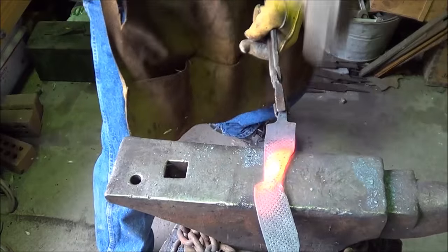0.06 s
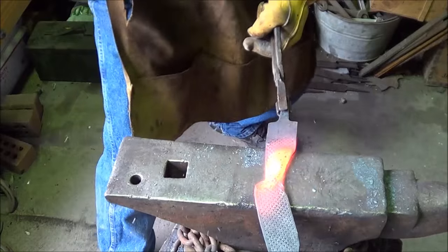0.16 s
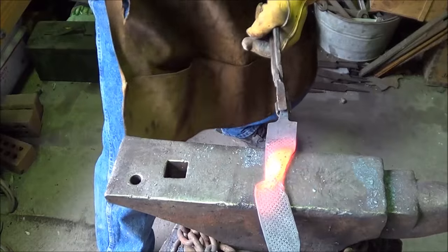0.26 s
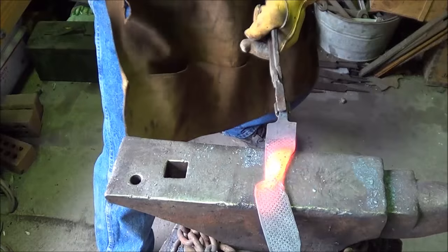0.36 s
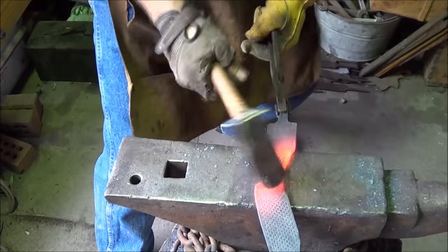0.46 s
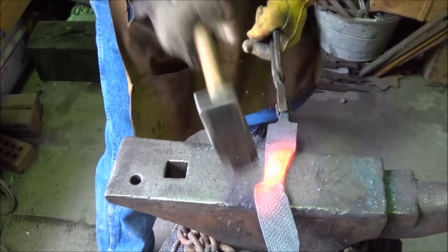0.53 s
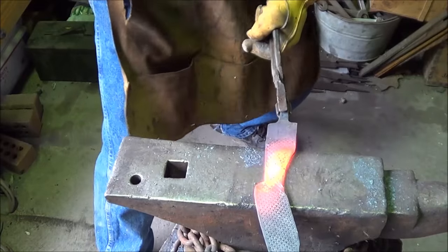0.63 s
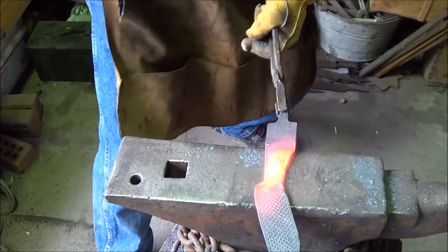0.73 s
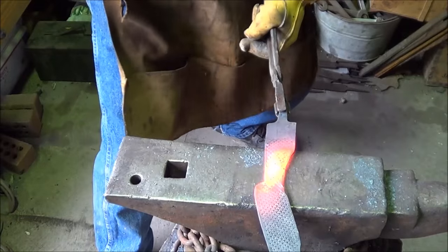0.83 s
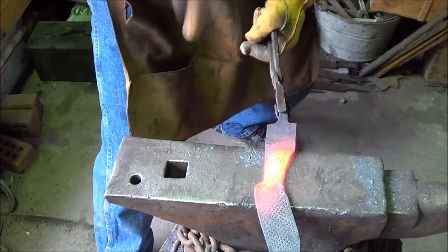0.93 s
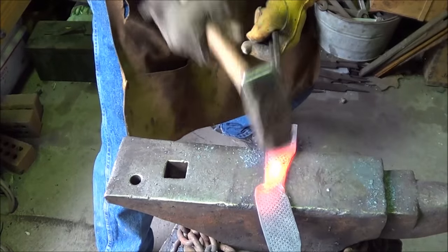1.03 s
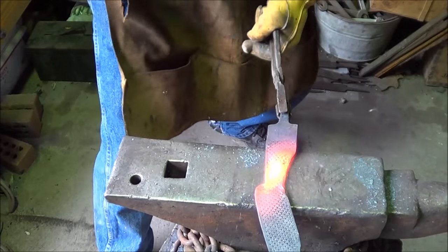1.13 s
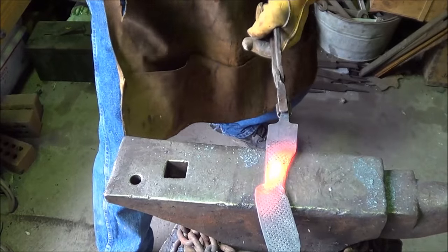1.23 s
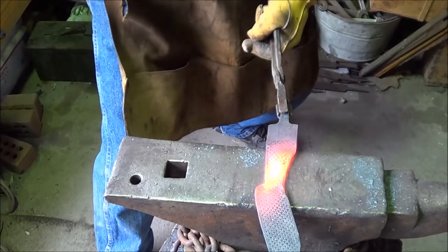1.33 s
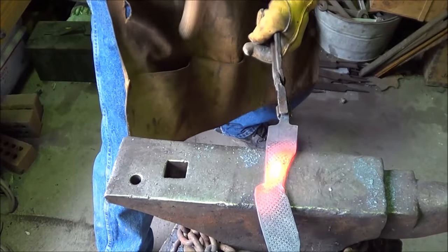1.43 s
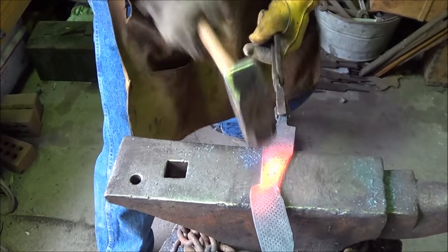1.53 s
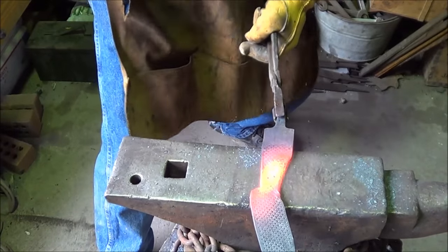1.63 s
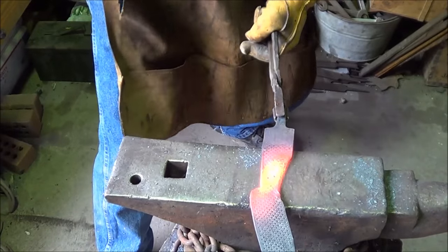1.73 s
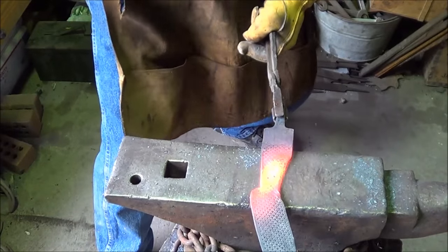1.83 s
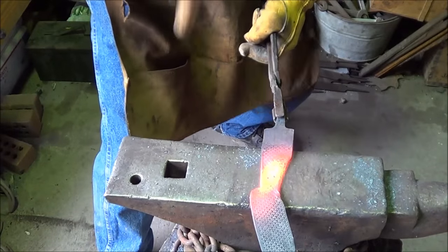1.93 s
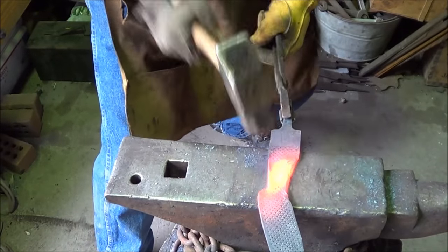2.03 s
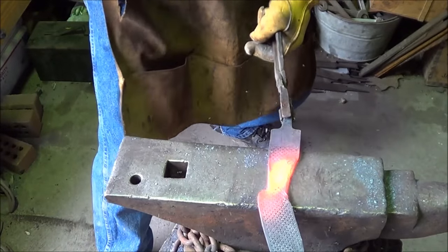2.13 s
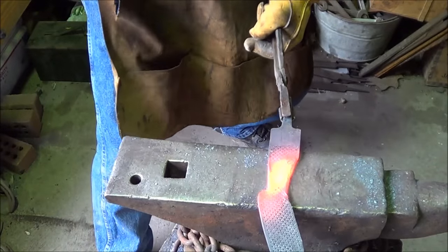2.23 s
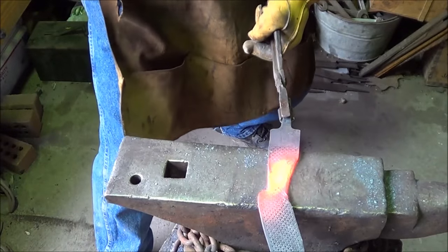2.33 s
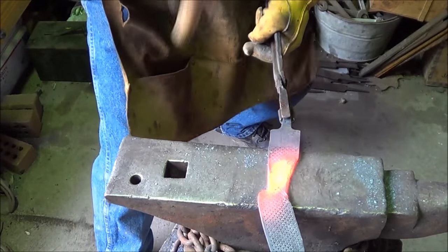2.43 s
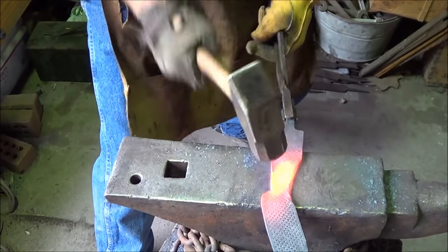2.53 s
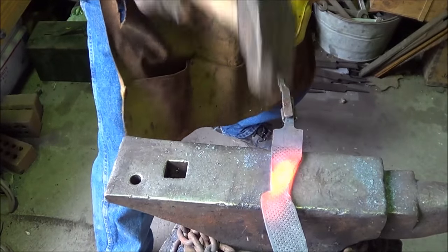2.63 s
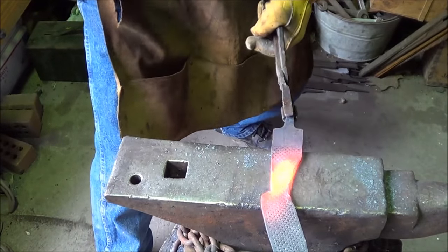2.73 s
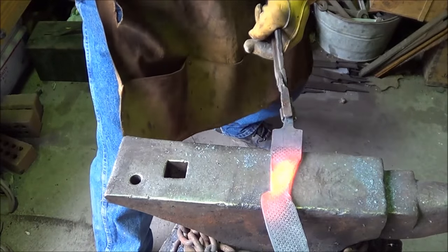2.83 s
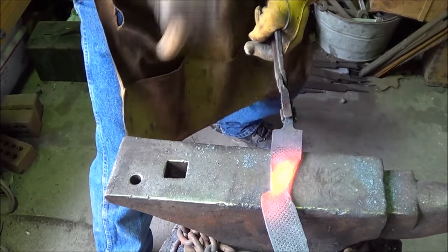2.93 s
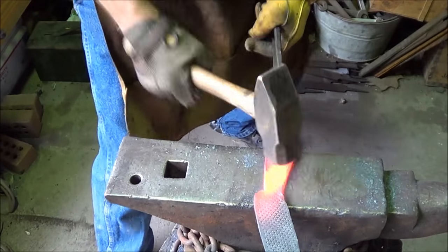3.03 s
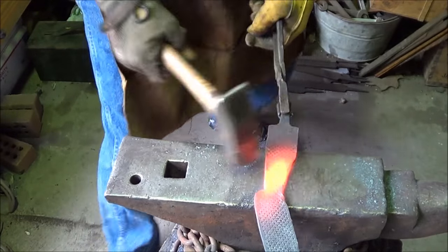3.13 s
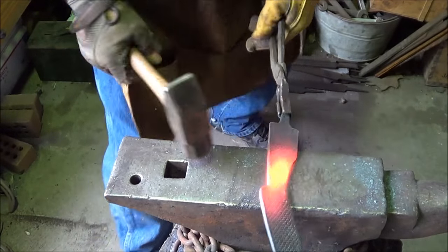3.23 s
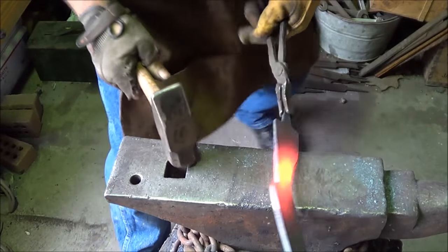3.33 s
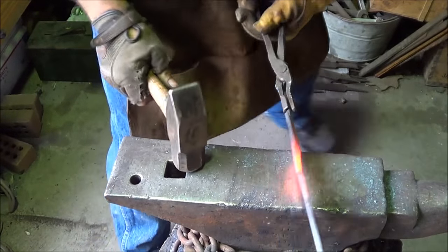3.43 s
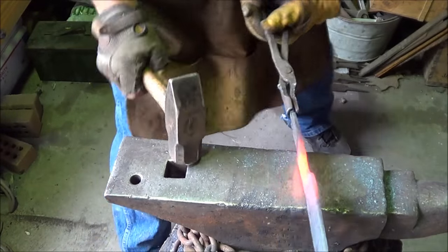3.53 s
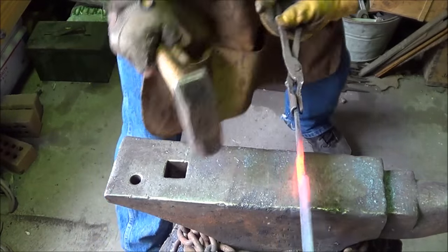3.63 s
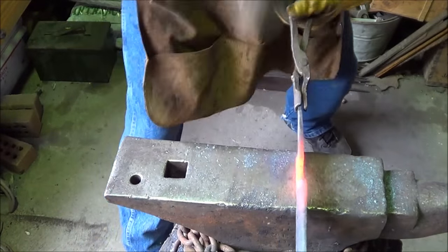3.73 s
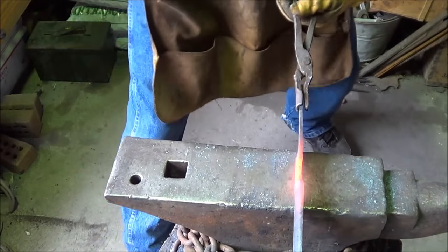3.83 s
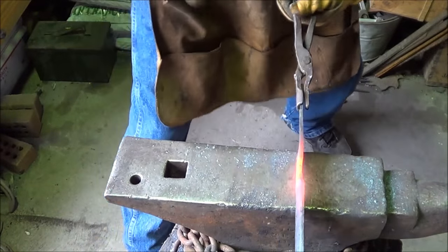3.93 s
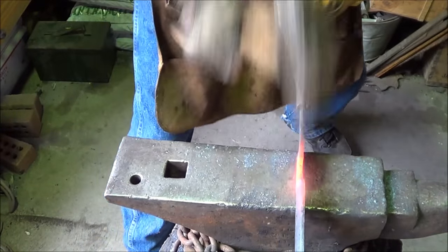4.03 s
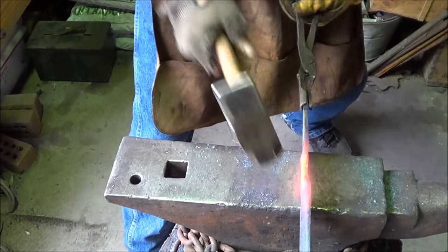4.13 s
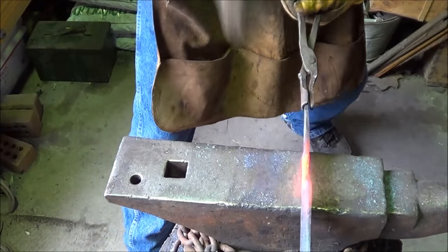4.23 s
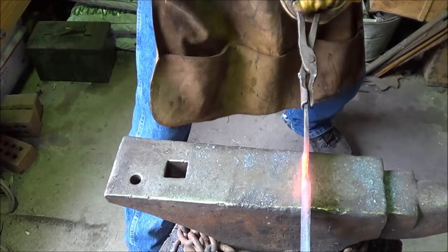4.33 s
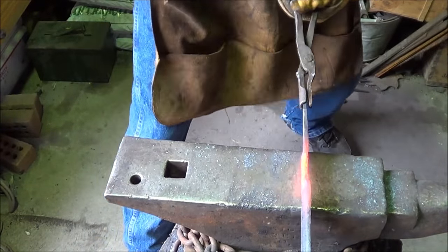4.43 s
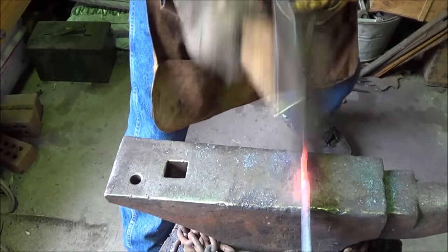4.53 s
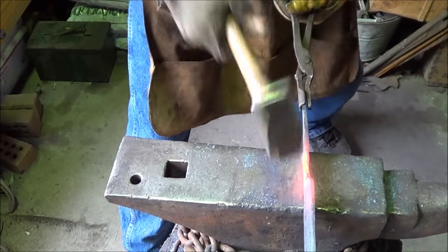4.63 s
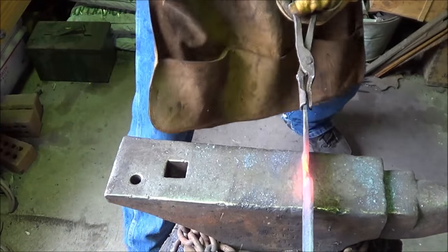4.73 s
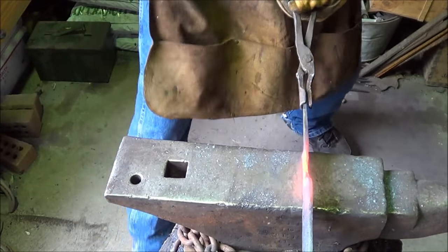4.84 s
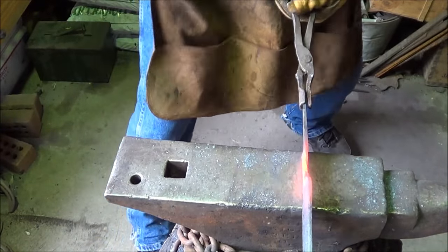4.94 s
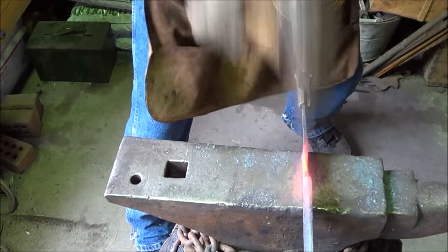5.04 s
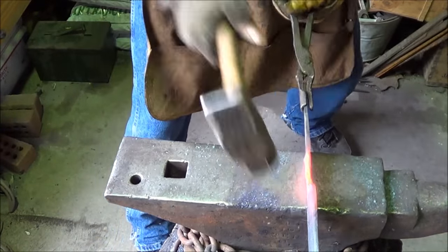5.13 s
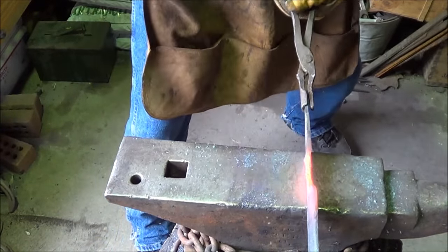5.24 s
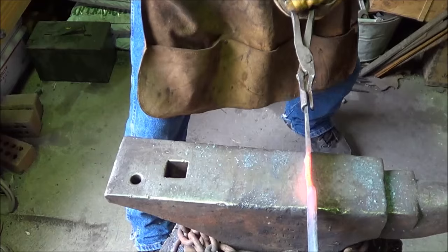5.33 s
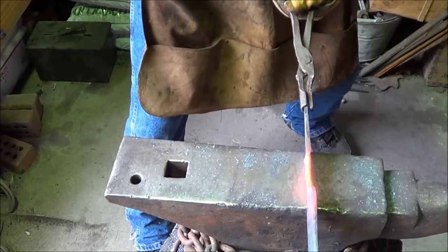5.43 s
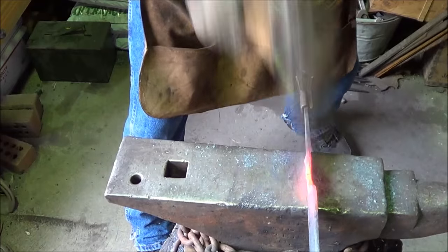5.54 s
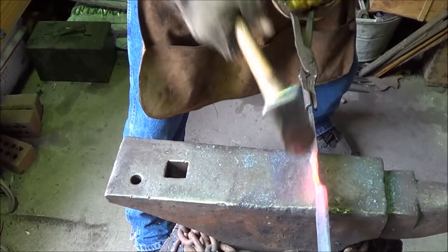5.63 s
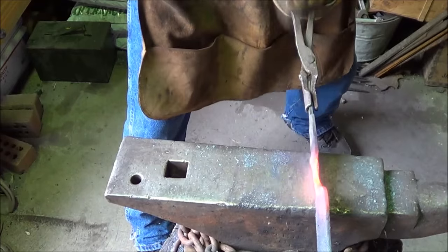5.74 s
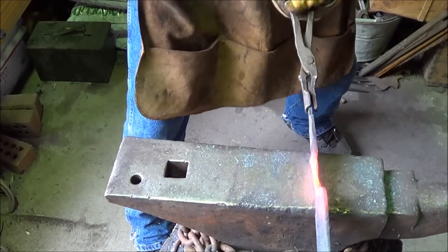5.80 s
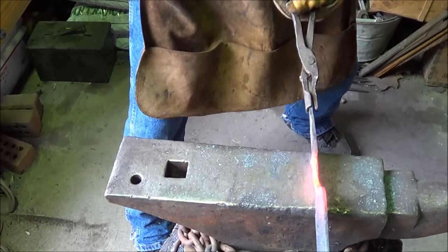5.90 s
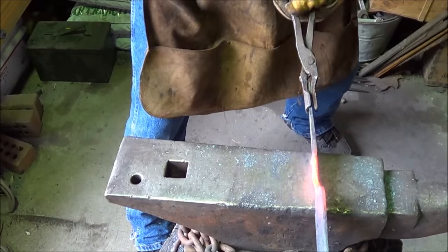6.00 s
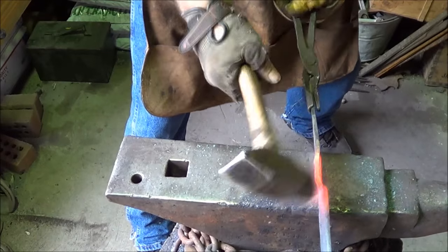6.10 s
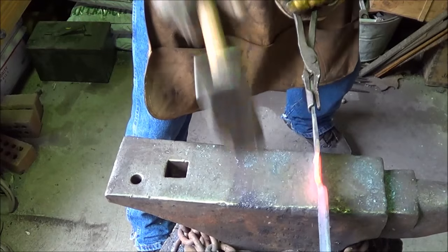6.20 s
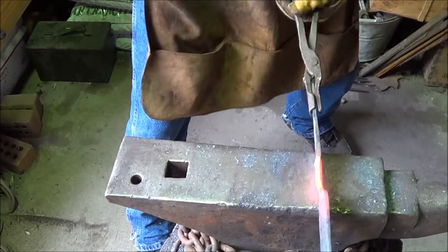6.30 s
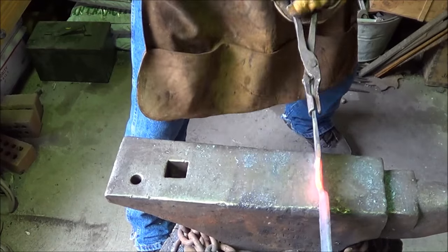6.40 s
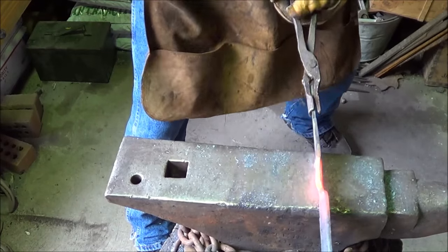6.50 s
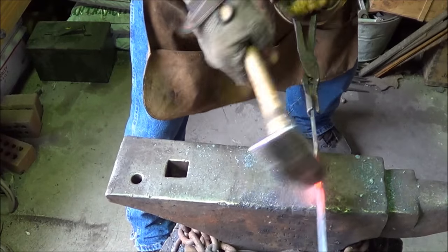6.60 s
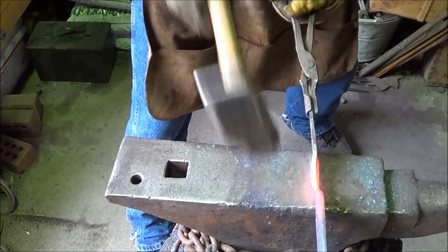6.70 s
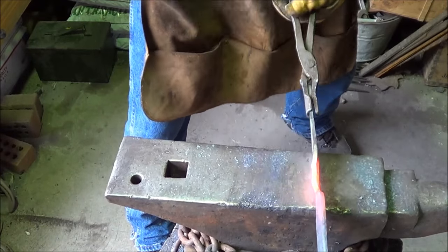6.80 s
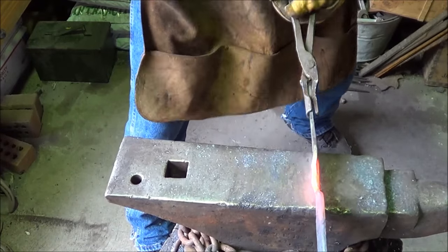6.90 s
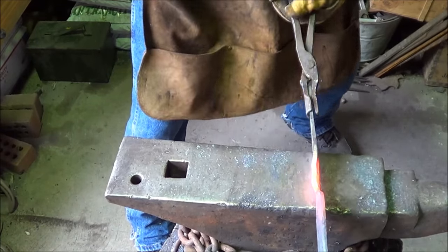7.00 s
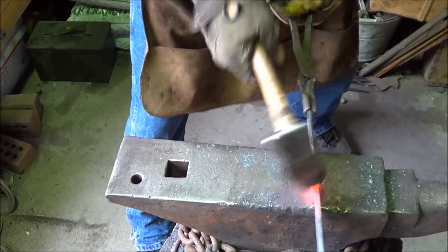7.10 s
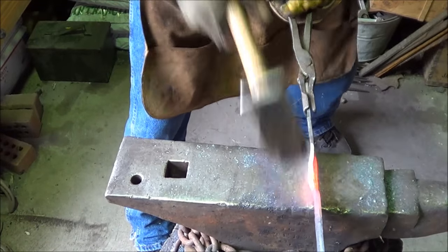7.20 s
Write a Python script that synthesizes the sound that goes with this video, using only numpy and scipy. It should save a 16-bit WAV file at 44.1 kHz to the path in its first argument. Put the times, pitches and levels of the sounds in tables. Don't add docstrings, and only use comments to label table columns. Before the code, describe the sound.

Steady loud hammer clangs on an anvil in a hard, echoing workshop, briefly broken by small taps and tong clicks, with a low fan hum beneath.

```python
import sys
import numpy as np
from scipy import signal
from scipy.fft import rfft, irfft
from scipy.io import wavfile
from scipy.ndimage import uniform_filter1d

SR = 44100
rng = np.random.default_rng(int(sys.argv[2]) if len(sys.argv) > 2 else 0)


def convert_level_to_amplitude(level_db):
    exponent = np.asarray(level_db, float) / 20
    return 10 ** exponent


def store_pcm(level_fs):
    pcm = np.round(np.clip(level_fs, -1, 1) * 32767).astype(np.int16)
    wavfile.write(sys.argv[1], SR, np.atleast_2d(pcm).T)


N = 320166


def rms_one(x):
    return x / np.sqrt(np.mean(x ** 2) + 1e-20)


def at_hz(points, hz):
    point_hz, value = np.array(points)[:, 0], np.array(points)[:, 1]
    return np.interp(np.log(hz), np.log(point_hz), value)


def strikes(seconds, db):
    clicks = np.full(N, 1e-18)
    places = np.round(np.asarray(seconds) * SR).astype(int)
    clicks[np.clip(places, 0, N - 1)] = convert_level_to_amplitude(np.asarray(db))
    return clicks


def fade(clicks, t60):
    return signal.lfilter([1], [1, -convert_level_to_amplitude(-60 / (t60 * SR))], clicks)


def build_up(clicks, t60, rise_s):
    r = np.exp(-1 / (rise_s * SR))
    return signal.lfilter([1 - r], [1, -r], fade(clicks, t60))


def band(x, low_hz, high_hz):
    sos = signal.butter(2, [low_hz, min(high_hz, 0.45 * SR)], "band", fs=SR, output="sos")
    return signal.sosfilt(sos, x)


def colour(x, spectrum):
    length = x.shape[-1]
    hz = np.fft.rfftfreq(length, 1 / SR) + 1
    return rms_one(irfft(rfft(x) * convert_level_to_amplitude(at_hz(spectrum, hz)), length))


# pitch_hz, side_minus_mid_db
WIDTH = [(60, -18), (180, -19.5), (550, -15), (1650, -13.5), (4970, -9.5), (15000, -19)]
# pitch_hz, left_minus_right_db
LEAN = [(60, -1), (240, -2), (950, -2.5), (3770, -0.5), (15000, -1)]


def spread(mid, side):
    hz = np.fft.rfftfreq(len(mid), 1 / SR) + 1
    lean = convert_level_to_amplitude(at_hz(LEAN, hz) / 2)
    m = rfft(mid)
    s = rfft(side) * convert_level_to_amplitude(at_hz(WIDTH, hz))
    left, right = (m + s) * lean, (m - s) / lean
    return np.array([irfft(left, len(mid)), irfft(right, len(mid))])


# start_s, force_db (over the limiter), thud_db, body_db, scale_spray_db
BLOWS = [(0.0, 6.5, 1, 4.5, 3), (0.5151, 13, -1.5, 3.5, 3), (1.0331, 12.5, -3.5, 6, 2.5),
         (1.537, 9.5, -2, 5, 1.5), (2.0396, 10, -6.5, 4.5, 1.5), (2.545, 13, -13, 2.5, -1),
         (3.048, 10.5, -9.5, 1.5, -3), (3.233, -3, -11.5, 1, -15), (3.368, -4, -5.5, 4, -23),
         (3.4309, -31, 13, 17, -26), (3.462, -39, -47, 18, -35), (4.118, 3.5, 2, 1, -7),
         (4.608, 3.5, 2, 4, -1), (5.1175, 8, -0.5, 3.5, -0.5), (5.62, 9, -1, 4, -2),
         (6.1322, 8.5, -2, 5.5, -5), (6.647, 11.5, -5, 4.5, -4.5), (7.157, 10, -4.5, 3, -7.5)]


def impact():
    start_s, force, thud, body, spray = np.transpose(BLOWS)
    noise = rng.standard_normal(N)
    flat_db = np.where(start_s < 3.0, 0, -9.0)
    push = band(strikes(start_s, force + flat_db + 17), 31, 320)
    sharp = 0.48 * force
    crack = band(noise, 2500, 18000) * fade(strikes(start_s + 0.00013, sharp + spray - 1.5), 0.02)
    clank_env = fade(strikes(start_s + 0.0006, sharp + body + 2.05), 0.018)
    bare = np.abs(np.arange(N) / SR - 3.6) < 0.4
    clank = np.where(bare, band(noise, 1370, 2380), band(noise, 780, 2000)) * clank_env
    return crack + clank - push


# pitch_hz, level_db (per Hz)
CRACK = [(24, -35), (40, -25), (237, 2.65), (570, -2.04), (770, -13.5), (2100, -11.5), (2840, -23),
         (3830, -10.5), (5050, -17.5), (7730, -2.5), (12800, -11), (16000, -66)]
# pitch_hz, t60_s
SHOP = [(60, 0.78), (160, 0.45), (420, 0.5), (1100, 0.43), (2900, 0.49), (7700, 0.37), (11000, 0.28),
        (15000, 0.085)]
EDGES = 30 * 2 ** np.arange(0, 9.3, 0.5)


def clangour():
    start_s, force, thud, body, spray = np.transpose(BLOWS)
    white, out = rng.standard_normal((2, 2, N)), np.zeros((2, N))
    stump_db = np.where(start_s < 4, -2, 3)
    for k, (low, high) in enumerate(zip(EDGES, EDGES[1:])):
        hz = np.sqrt(low * high)
        dull = at_hz([(500, 1), (800, 0)], hz)
        bright = at_hz([(4000, 0), (6000, 1)], hz)
        db = force + dull * thud + bright * spray + (1 - dull - bright) * body + at_hz(CRACK, hz)
        db += at_hz([(90, 1), (260, 0.23)], hz) * stump_db
        envelope = build_up(strikes(start_s, db - 2.0), at_hz(SHOP, hz), 0.0077 + 0.36 / low)
        out += band(white[k % 2], low, high) * envelope
    return spread(out[0], 1.79 * out[1])


# bend_db, twist_db, horn_db, face_db, edge_db
LANDING = [(-11, -21.5, -24, -13, -18), (-14.5, -20, -22, -28, -12), (-2.5, -19, -12, -15.5, -8),
           (-7, -17.5, -34, -12, -17), (-2, -10.5, -5, -9, -8), (-2.5, -15, -17.5, -7.5, -6.5),
           (-3, -20, -31, -11.5, -14), (-15, -33, -6.5, -13, -33), (-2, -17.5, -3.5, -19.5, -32),
           (-17, -32, -9, -26, -28), (-14, -38, -35, -35, -35), (-14.5, -31, -17.5, -16.5, -27),
           (-21, -20, -19, -9.5, -14), (-3, -12.5, -10.5, -6, -22), (-6, -11, -3.5, -15, -19),
           (-3.5, -9, -4, -18, -27), (-1.5, -13, -1, -10.5, -25), (-5, -14.5, -16, -13.5, -22)]
ANVIL_HZ = [
    [2110, 2102, 2684],
    [3755, 3743, 1836],
    [4720, 4540, 5655],
    [6438, 6320, 7300, 8493],
    [12623, 12940],
]
# level_db, t60_s
ANVIL = [
    [(10.5, 0.15), (-14, 0.5), (-20.5, 0.42)],
    [(4.5, 0.34), (-4, 0.42), (0, 0.3)],
    [(2, 0.33), (-17.5, 0.19), (-15, 0.089)],
    [(-0.5, 0.26), (11.5, 0.046), (4, 0.079), (11, 0.078)],
    [(9.5, 0.22), (-1, 0.1)],
]
BLOOM_S = [0.014, 0.013, 0.012, 0.012, 0.0077]


def anvil():
    start_s, force = np.transpose(BLOWS)[:2]
    t = np.arange(N) / SR
    bare = np.where(force < 3, 0.35, 1)
    chance_db = iter(rng.standard_normal((len(start_s), 15)).T)
    out = np.zeros(N)
    for share, pitches, modes, rise_s in zip(np.transpose(LANDING), ANVIL_HZ, ANVIL, BLOOM_S):
        for hz, (level_db, t60) in zip(pitches, modes):
            mode_db = max(level_db, 0) + bare * min(level_db, 0)
            db = force + share + mode_db - 11.0 + next(chance_db)
            out += build_up(strikes(start_s, db), t60, rise_s) * np.sin(2 * np.pi * hz * t)
    rest_s, rest_loss_db_per_s = 3.51, 300
    resting = np.maximum(t - rest_s, 0) * (t < 4.1)
    return out * convert_level_to_amplitude(-rest_loss_db_per_s * resting)


# start_s, struck_db, turn_s (after the blow), turned_db, turned_away_loss_db
HEAD = [(0.0, -43, .14, -30, 35), (0.5153, -38, 0.16, -16.5, 40), (1.032, -24, 0.14, -14, 29),
        (1.536, -14, 0.12, -10.5, 24.5), (2.04, -11.5, 0.11, -7.5, 22.5), (2.544, -19.5, .15, -13.5, 27),
        (3.0506, -23, 0.064, -23, 39), (3.233, -42, 0.076, -41, 5), (3.3683, -45, .12, -44, 23.5),
        (4.1183, -32, 0.18, -30.5, 39), (4.607, -26, .17, -28.5, 46), (5.1164, -26, .18, -21, 33),
        (5.62, -43, 0.19, -22, 71), (6.1309, -33, 0.19, -26, 37), (6.646, -28, 0.2, -28.5, 36),
        (7.157, -26.5, .15, -12, 35)]


def turning(t):
    row = np.maximum(np.searchsorted(np.array(HEAD)[:, 0], t) - 1, 0)
    start_s, struck_db, turn_s, turned_db, loss_db = np.array(HEAD)[row].T
    struck_loss_db_per_s, turn_in_db_per_s = 103, 223
    turn_away_s, ring_loss_db_per_s = 0.11, 25.5
    past = t - start_s - turn_s
    away = np.maximum(past, 0)
    facing_db = turned_db + turn_in_db_per_s * np.minimum(past, 0)
    facing_db -= loss_db * (1 - np.exp(-away / turn_away_s)) + ring_loss_db_per_s * away
    struck = convert_level_to_amplitude(struck_db - struck_loss_db_per_s * (t - start_s)) * (past < 0)
    return struck + convert_level_to_amplitude(facing_db)


# after_blow_s, speed_m_per_s (towards the microphone)
SWING = [(0, 0), (.05, 0.5), (.14, 2), (.22, -2.08), (.28, -1.5), (.35, 0.55), (.45, 3.5), (.51, 4)]
# speed_share (along the path), level_db
PATHS = [(1, 2), (-1.5, -6), (0.36, 2), (-0.14, -14)]


def hammer_head():
    start_s, force = np.transpose(BLOWS)[:2]
    t = np.arange(N) / SR
    since = t - start_s[np.maximum(np.searchsorted(start_s, t) - 1, 0)]
    resting = (t > 3.05) & (t < 4.0)
    speed = np.interp(since, *np.transpose(SWING)) * np.where(resting, 0.15, 1)
    travel = np.cumsum(speed) / SR / 343
    head_hz = 11000
    tone = sum(convert_level_to_amplitude(db) * np.sin(2 * np.pi * head_hz * (t + along * travel)) for along, db in PATHS)
    fresh = np.maximum(fade(strikes(start_s, force), 0.87), 1)
    return tone * fresh * turning(t)


# start_s, level_db, pitch_hz, length_s
TICKS = [
    (0.397, -43, 9000, 0.05),
    (0.958, -40, 10500, 0.1),
    (2.8505, -11.5, 1750, 0.13),
    (3.2356, -5.5, 5500, 0.026),
    (3.433, -11, 1820, 0.019),
    (3.732, -76, 2110, 0.24),
    (3.847, -32.5, 9000, 0.19),
]
# pitch_hz, level_db (per Hz)
SCUFF_COLOUR = [(180, -39), (300, -5), (756, -7.5), (1030, -6), (2210, -6.5), (2830, -15.5), (7020, -15),
                (15500, -22)]


def handling():
    out, t = np.zeros(N), np.arange(N) / SR
    noise, after = rng.standard_normal((len(TICKS), SR // 2)), t[:SR // 2]
    for (start_s, db, hz, length_s), burst in zip(TICKS, noise):
        tick = band(burst, hz / 1.8, hz * 1.45) * convert_level_to_amplitude(db + 4 - 60 * after / 0.016)
        hiss = band(burst, 6900, 10800) * convert_level_to_amplitude(db - 4 - 60 * after / max(length_s, 0.01))
        out[round(start_s * SR):][:SR // 2] += tick + hiss
    peak_s, peak_db, swell_db_per_s, fade_db_per_s = 4.945, -22, 215, 316
    scuff_db = peak_db - np.maximum(swell_db_per_s * (peak_s - t), fade_db_per_s * (t - peak_s))
    uneven = convert_level_to_amplitude(2.3 * rng.standard_normal(N))
    grit = colour(rng.standard_normal(N) * uneven, SCUFF_COLOUR)
    return out + grit * convert_level_to_amplitude(scuff_db)


def shop(x, wet_db):
    t = np.arange(SR) / SR
    white, echo = rng.standard_normal((2, 2, SR)), np.zeros((2, SR))
    for k, (low, high) in enumerate(zip(EDGES, EDGES[1:])):
        rise = 1 - np.exp(-t / (0.006 + 14.0 / low))
        decay = convert_level_to_amplitude(-60 * t / at_hz(SHOP, np.sqrt(low * high)))
        echo += band(white[k % 2], low, high) * rise * decay
    echo *= convert_level_to_amplitude(wet_db) / np.sqrt(np.sum(echo[0] ** 2))
    mid, side = [signal.fftconvolve(x, e)[:N] for e in echo]
    return spread(x + mid, 1.93 * side)


def far_walls():
    start_s, force = np.transpose(BLOWS)[:2]
    return convert_level_to_amplitude(-0.5) + build_up(strikes(start_s, force - 13), 0.95, 0.051)


# pitch_hz, level_db (per Hz)
BLOWER = [(15, -57), (25, -24), (92, -8), (190, -6), (290, 2), (641, -1), (887, -2.5), (962, 0),
          (1260, -11.5), (1560, -10), (4370, -22), (9070, -21.5), (16000, -33)]
# pitch_hz, level_db (rms)
DRONE = [
    (118.4, -56.5),
    (629.8, -55),
    (963.6, -54.5),
    (990.5, -77),
    (15735, -73),
]


def blower():
    air, hz = rng.standard_normal((2, N)), np.fft.rfftfreq(N, 1 / SR)
    lines = np.zeros(N)
    for line_hz, db in DRONE:
        resonance = 1 / (1 + ((hz - line_hz) / 10.0) ** 2)
        lines += convert_level_to_amplitude(db) * rms_one(irfft(rfft(air[1]) * resonance, N))
    mid, side = convert_level_to_amplitude(-41) * colour(air, BLOWER)
    return spread(mid + lines, 1.37 * side)


def scene():
    head = hammer_head()
    small = shop(handling() + 0.67 * head, wet_db=-6)
    ring = shop(anvil(), wet_db=-23)
    return impact() + clangour() + small + ring + 0.22 * head + far_walls() * blower()


def gate_treble(x, margin_db):
    hz, _, frames = signal.stft(x, SR, nperseg=1024)
    power = np.mean(np.abs(frames) ** 2, axis=0)
    whole = power.sum(axis=0)
    width_hz = 650
    for low in np.arange(11400, 16000, width_hz):
        part = (hz >= low) & (hz < low + width_hz)
        threshold_db = margin_db - 1.3 * (low / 1000 - 12)
        frames[:, part] *= power[part].sum(axis=0) > whole * convert_level_to_amplitude(2 * threshold_db)
    return signal.istft(frames, SR, nperseg=1024)[1][:, :N]


def band_limit(x):
    return signal.sosfilt(signal.butter(12, 16680, fs=SR, output="sos"), x)


def record(dry):
    t = np.arange(N) / SR
    level_db = 10 * np.log10(uniform_filter1d(np.mean(dry ** 2, axis=0), size=128) + 1e-12)
    over_db = np.maximum(level_db + 12.0, 0)
    release_db_per_s, attack_s = 450, 0.00058
    held_db = np.maximum.accumulate(over_db + release_db_per_s * t) - release_db_per_s * t
    smooth = np.exp(-1 / (attack_s * SR))
    gain = convert_level_to_amplitude(-0.95 * signal.lfilter([1 - smooth], [1, -smooth], held_db))
    overloaded = 1.092 * np.tanh(dry * gain / 1.003)
    top_cut = signal.cheby2(10, 50, 17000, fs=SR, output="sos")
    mix = gate_treble(signal.sosfilt(top_cut, overloaded), margin_db=-34.5)
    return band_limit(mix)


dry = scene()
out = record(dry)
store_pcm(out)
```